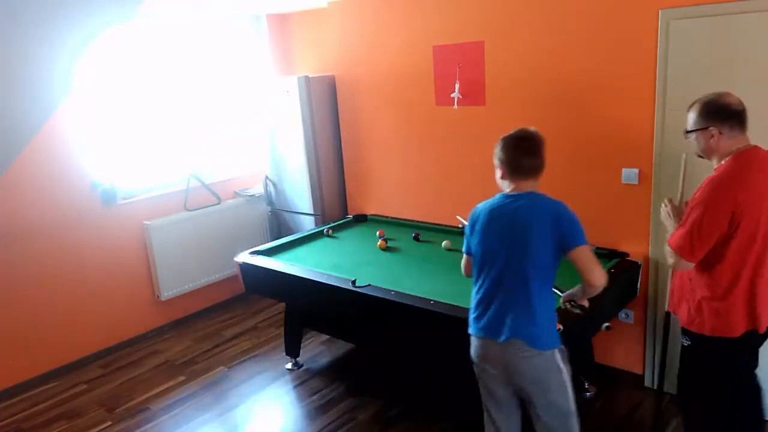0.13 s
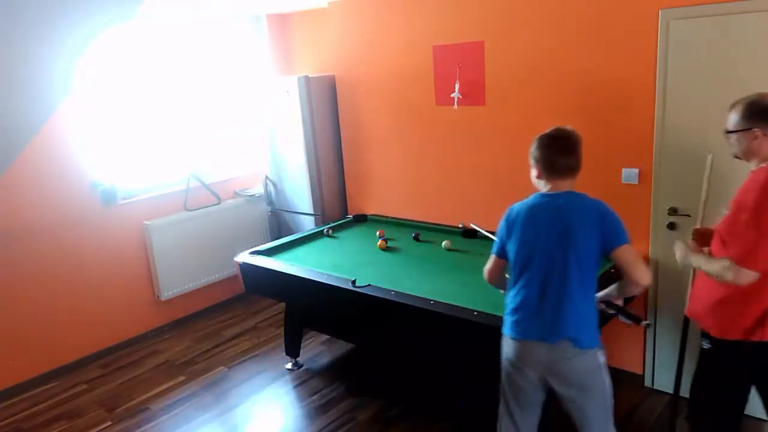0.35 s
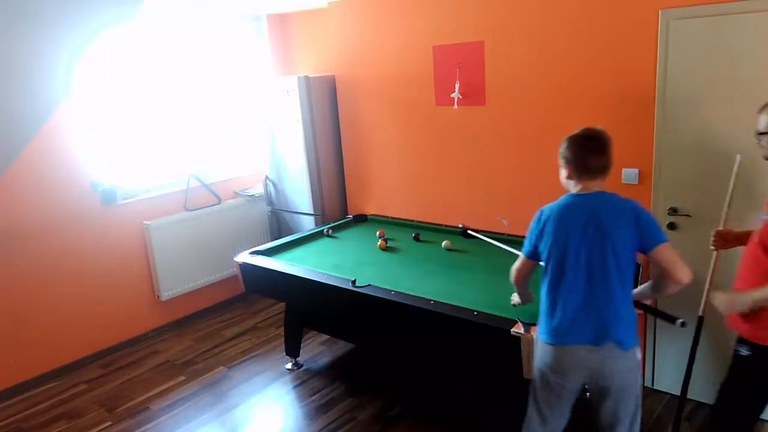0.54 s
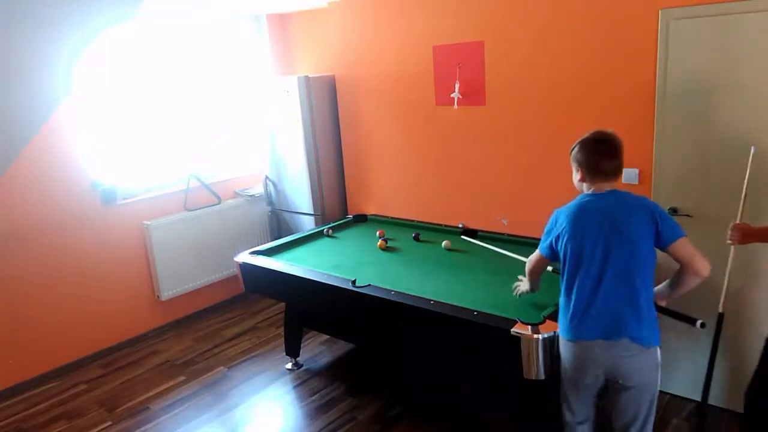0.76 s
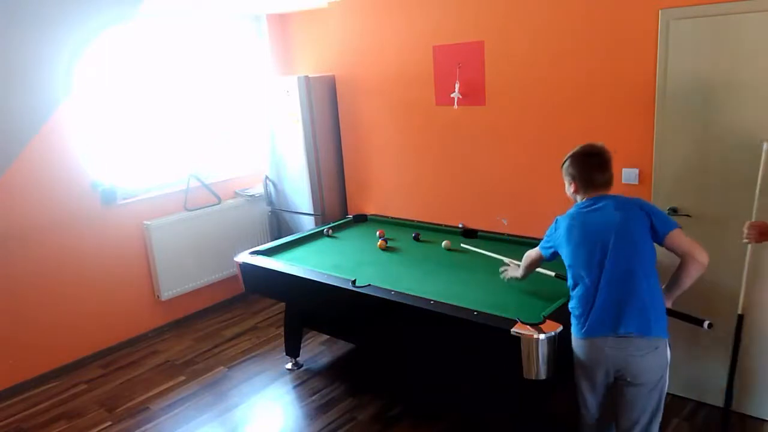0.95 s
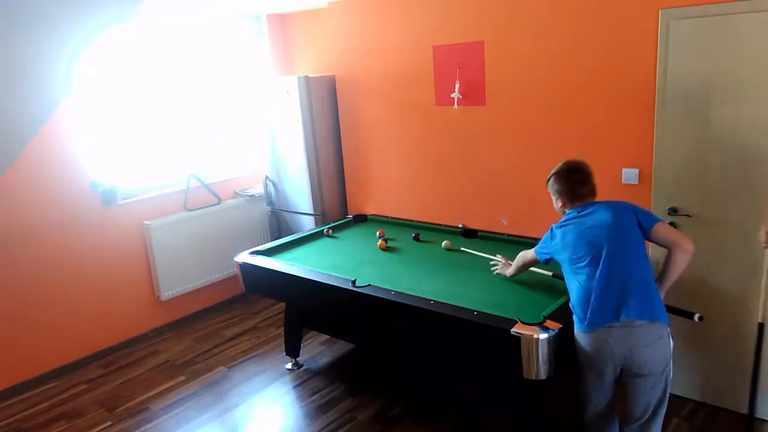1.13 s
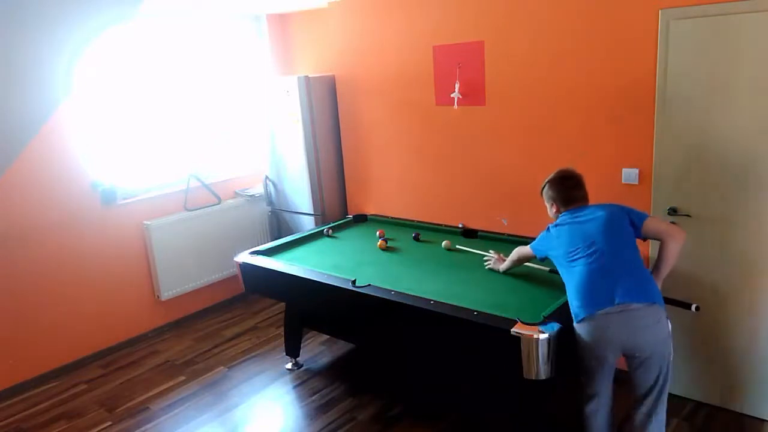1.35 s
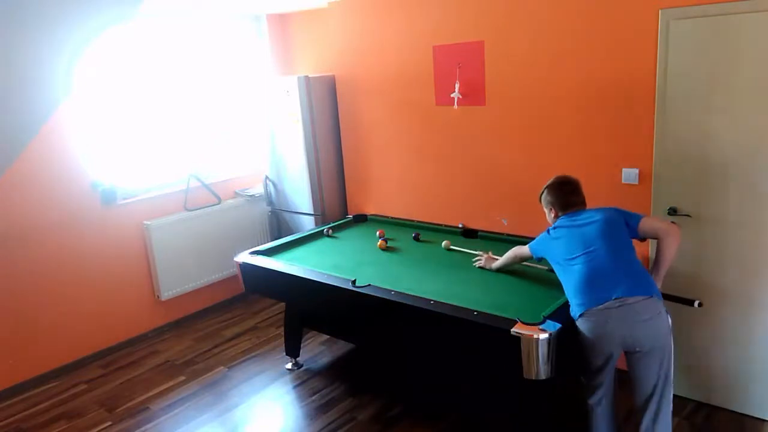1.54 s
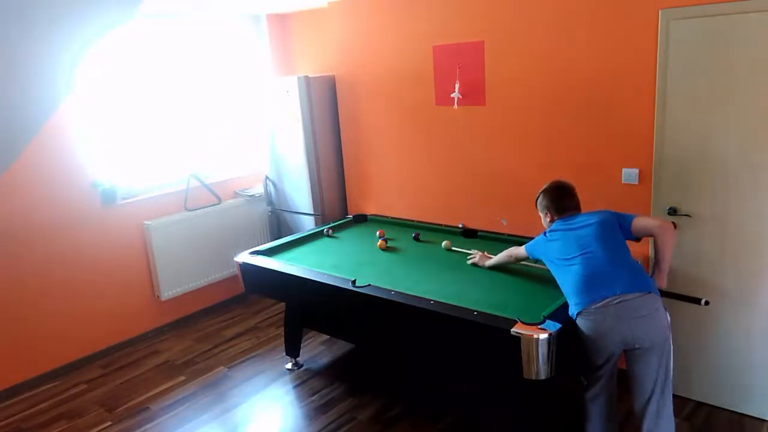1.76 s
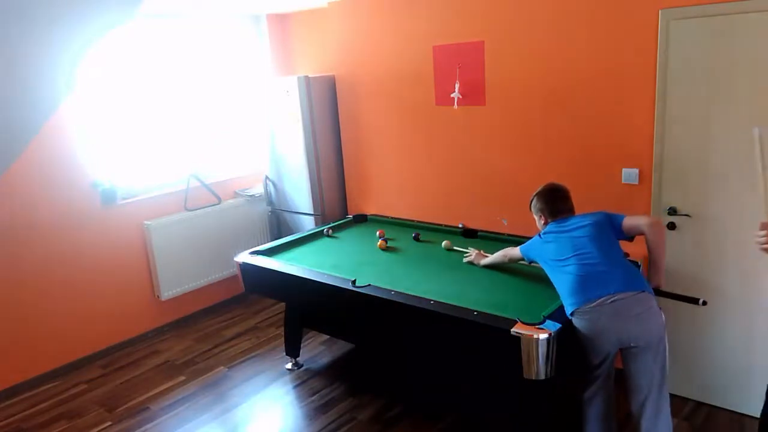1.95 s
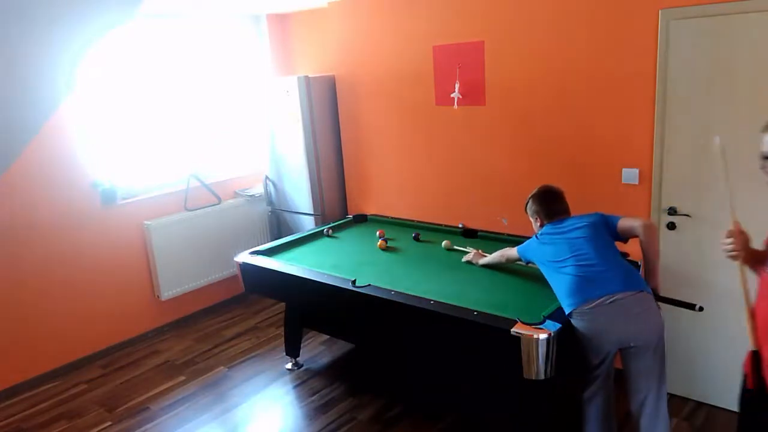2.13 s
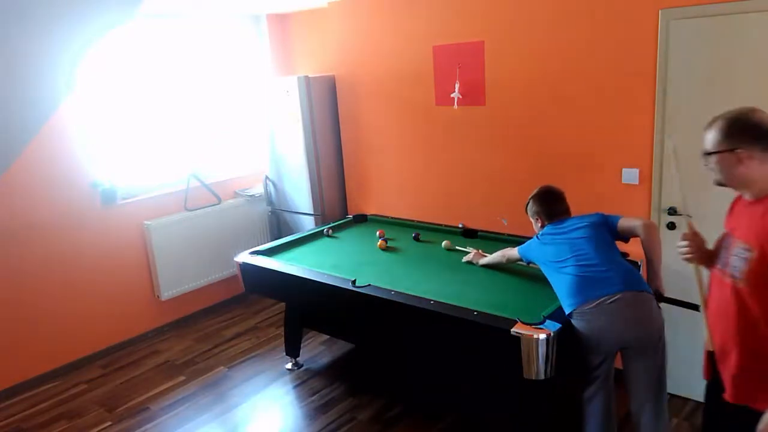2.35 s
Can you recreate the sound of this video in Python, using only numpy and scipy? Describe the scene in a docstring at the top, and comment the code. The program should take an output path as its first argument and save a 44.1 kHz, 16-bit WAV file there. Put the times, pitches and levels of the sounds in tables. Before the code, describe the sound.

Pool cue knocks in a reverberant home room: a loud wooden bang, duller knocks, a sharp ball clack

```python
"""Soles thud and scuff on laminate in a hard-walled home room with a pool table, heard from across the room.
Something wooden bangs, a cue butt knocks, the cue tip clacks on the ball: pushes through resonant bodies,
heard only as the room's answer of shaped noise and standing waves. Clothes and shoes swish (swelling noise)
over rumble and air. It reaches a camera with two ports: the left resonates, the covered right is dull and weak."""
import sys
import numpy as np
from scipy import signal
from scipy.fft import rfft, irfft, next_fast_len
from scipy.io import wavfile
from scipy.ndimage import map_coordinates

SR = 44100
rng = np.random.default_rng(int(sys.argv[2]) if len(sys.argv) > 2 else 0)


def store_pcm(level_fs):
    """Save levels as 16-bit WAV."""
    pcm = np.round(np.clip(level_fs, -1, 1) * 32767).astype(np.int16)
    wavfile.write(sys.argv[1], SR, np.atleast_2d(pcm).T)


N = 105840

# room answer by source place: early parts in dB over the plain tail, *_s of early parts = t60, build_s = time constant
FEET = dict(first_db=1.5, first_s=.03, build_s=.0039, early_db=5.5, early_s=.28)
NEAR = dict(first_db=-4, first_s=.039, build_s=.0022, early_db=-14, early_s=.13)
CORNER = dict(first_db=1, first_s=.031, build_s=.005, early_db=-1, early_s=.4)
TABLE = dict(first_db=5.5, first_s=.029, build_s=.0016, early_db=-19, early_s=.12)


def amp(db):
    """Amplitude ratio of a level in dB."""
    return 10 ** (np.asarray(db) / 20)


def unit(x):
    """x scaled to rms 1 per channel."""
    return x / np.sqrt(np.mean(x ** 2, axis=-1, keepdims=True) + 1e-20)


def along(points, hz):
    """Interpolate (f/Hz, value) points on a log frequency axis."""
    f, v = np.transpose(points)
    return np.interp(np.log(hz + 1), np.log(f + 1), v)


def filtered(x, response):
    """x times a complex response of frequency, zero-padded."""
    n = x.shape[-1]
    m = next_fast_len(n + SR // 4)
    return irfft(rfft(x, m) * response(np.fft.rfftfreq(m, 1 / SR)), m)[..., :n]


def hiss(spectrum):
    """Independent shaped noise of rms 1 in both channels."""
    white = rng.standard_normal((2, N))
    return unit(filtered(white, lambda hz: amp(along(spectrum, hz))))


def wobble(rate_hz):
    """Smooth random curve with rate_hz knots a second."""
    knots = rng.standard_normal(int(N * rate_hz / SR) + 4)
    return map_coordinates(knots, [np.arange(N) * rate_hz / SR])


def background():
    """Lumpy low rumble and the faint air of the room, as slowly wavering noise."""
    # rumble level: t/s, level/dB
    rumble_course = [(0, -53.5), (.24, -71.5), (.41, -47), (0.689, -59), (.88, -68), (1.1, -67.5),
                     (1.3, -58.5), (1.56, -63.5), (1.82, -54.5), (2.4, -59.5)]
    # rumble spectrum: f/Hz, level/dB
    rumble_spectrum = [(20, -38.5), (32, -27.5), (48, -1), (90, -6), (160, -14.5), (300, -22.5), (600, -75)]
    # air spectrum: f/Hz, level/dB
    air_spectrum = [(100, -8.5), (300, -9.5), (550, -9), (850, -7.5), (1300, -16), (3000, -21), (7000, -23),
                    (15000, -16)]
    air_db = -60
    t_s, db = np.transpose(rumble_course)
    rumble_db = np.interp(np.arange(N) / SR, t_s, db) + 2.1 * wobble(9.34)
    rumble = amp(rumble_db) * hiss(rumble_spectrum)
    return rumble + amp(air_db + 0.5 * wobble(4.08)) * hiss(air_spectrum)


def swishes():
    """Cloth and soles brushing: bright noise with Gaussian swell and exponential fade."""
    # brushes: peak t/s, level/dB, rise/s, t60/s
    brushes = [(-.1, -46.5, .1, 1), (0.188, -44, 0.012, 1), (0.729, -56, 0.022, .45),
               (1.06, -70.5, 0.055, 0.54), (1.47, -57.5, 0.048, 0.96), (1.53, -64, 0.03, 0.38),
               (1.641, -66.5, 0.046, 0.42), (1.82, -64, 0.079, 0.89), (2.17, -51, 0.027, 0.36)]
    # brushing spectrum: f/Hz, level/dB
    cloth = [(200, -26), (800, -3), (1500, -5.5), (3000, -5.5), (5000, -4.5), (7000, -5), (10000, -7.5),
             (15000, -20.5)]
    t = np.arange(N) / SR
    shape = np.zeros(N)
    for peak_s, db, rise_s, t60_s in brushes:
        swell = np.exp(-((t - peak_s) / rise_s) ** 2)
        fade = amp(-60 * np.abs(t - peak_s) / t60_s)
        shape += amp(db) * np.where(t < peak_s, swell, fade)
    return shape * amp(0.5 * wobble(28.34)) * hiss(cloth)


def room(first_db, first_s, build_s, early_db, early_s):
    """Room answer in two channels: a noise tail dying by band plus standing waves, with build-up and early boost."""
    # reverberation: f/Hz, t60/s
    decay = [(60, 0.36), (150, 0.77), (300, 0.54), (700, 0.76), (1800, 0.71), (5000, 0.61), (13000, 0.46)]
    # standing waves: f/Hz, level re tail/dB, t60/s
    modes = [(189.2, -25, 0.62), (279, -26.5, 0.58), (337.5, -28, 0.68), (378, -27, 0.52),
             (434, -24.5, 0.23), (566, -21.5, 0.5), (722, -27, 0.48), (889, -28.5, 0.77)]
    hz, t, z = signal.stft(rng.standard_normal((2, SR)), SR, nperseg=256)
    z = z * amp(-60 * t / along(decay, hz)[:, None])
    tail = signal.istft(z, SR, nperseg=256)[1][:, :SR]
    tail = tail / np.linalg.norm(tail[0])
    t = np.arange(SR) / SR
    for f, db, t60_s in modes:
        phase_turns = rng.random((2, 1))
        wave = amp(-60 * t / t60_s) * np.sin(2 * np.pi * (f * t + phase_turns))
        tail = tail + amp(db) * wave / np.linalg.norm(wave[0])
    build = 1 - np.exp(-t / build_s)
    early = amp(early_db - 60 * t / early_s)
    first = amp(first_db - 60 * t / first_s)
    return tail * build * (1 + early + first)


def causal(power):
    """Minimum-phase pulse with this power spectrum, by cepstral folding."""
    c = irfft(np.log(power + 1e-14) / 2)
    c = c * np.where(np.arange(len(c)) < len(c) // 2, 2, 0)
    return irfft(np.exp(rfft(c) - c[0] / 2))


def knocks(events, body, place):
    """Each contact: a soft-edged push through the body's steep resonances plus a high crack, sent into the room."""
    out = np.zeros((2, N + 2 * SR))
    f = np.fft.rfftfreq(8192, 1 / SR)
    ring = np.zeros(len(f))  # power spectrum
    for centre_hz, width_hz, db in body:
        damping = (f * width_hz) ** 2
        peak = damping / ((centre_hz ** 2 - f * f) ** 2 + damping)
        ring += amp(db) ** 2 * peak ** 1.53
    for s, db, soft_hz, crack_db in events:
        push = ring / (1 + (f / soft_hz) ** 2) ** 2
        crack = amp(crack_db) ** 2 * f ** 2 / (f ** 2 + soft_hz ** 2)
        blow = causal(push + crack)
        blow = amp(db) * blow / np.linalg.norm(blow)
        heard = signal.fftconvolve(blow[None], room(**place), axes=1)
        start = round(s * SR)
        out[:, start:start + heard.shape[1]] += heard
    return out[:, :N]


def steps():
    """Soles on laminate: contacts exciting broad floorboard resonances."""
    # contacts: t/s, level/dB, softness corner f/Hz, crack re 0 dB body peak/dB
    contacts = [(.176, -5, 3000, -34.5), (.195, -2.5, 2500, -44.5), (.24, -4, 900, -42),
                (.255, -4, 700, -55)]
    # floorboard: f/Hz, width/Hz, level/dB
    floorboard = [(108.4, 120, -4), (192, 100, 1.5), (319, 108, -2.5), (710, 154, -6.5), (1290, 760, -14),
                  (2480, 2400, -17)]
    return knocks(contacts, floorboard, FEET)


def thumps():
    """Low thumps: very soft pushes on one deep joist resonance."""
    # contacts: t/s, level/dB, softness corner f/Hz, crack re 0 dB body peak/dB
    contacts = [(.185, -17.5, 200, -68), (.41, -17, 200, -70), (.56, -16.5, 199, -63),
                (2.18, -16.5, 200, -68)]
    # joists: f/Hz, width/Hz, level/dB
    joists = [(65, 22, 0)]
    return knocks(contacts, joists, FEET)


def wooden_bang():
    """Wooden bang: two close contacts on a many-moded wooden body."""
    # contacts: t/s, level/dB, softness corner f/Hz, crack re 0 dB body peak/dB
    contacts = [(.367, 12.5, 3000, -27.5), (.373, 18.5, 3000, -38.5)]
    # wood: f/Hz, width/Hz, level/dB
    wood = [(126, 42, -6.5), (187, 124, -7), (282.5, 120, 1.5), (492, 300, -9), (780, 310, -4),
            (950, 320, -6.5), (1423, 630, -8.5), (2280, 1800, -16.5), (3730, 2300, -18)]
    return knocks(contacts, wood, NEAR)


def butt_knocks():
    """Cue butt: two main knocks and weaker contacts exciting the cue's resonances."""
    # contacts: t/s, level/dB, softness corner f/Hz, crack re 0 dB body peak/dB
    contacts = [(1.146, -9.5, 900, -49), (1.151, 9.5, 2500, -41.5), (1.877, 4.5, 1120, -51.5),
                (2.003, -11, 900, -47), (2.088, -10.5, 900, -47)]
    # cue: f/Hz, width/Hz, level/dB
    cue = [(146, 40, -12.5), (294.6, 104, 0.5), (431, 226, 0), (611, 170, -7), (830, 267, -5.5),
           (1300, 460, -16), (1736, 420, -11), (2550, 250, -13), (3230, 400, -14.5), (4180, 990, -20)]
    return knocks(contacts, cue, CORNER)


def ball_clack():
    """Cue tip on ball: two close hard contacts, brightest near 2.4 kHz."""
    # contacts: t/s, level/dB, softness corner f/Hz, crack re 0 dB body peak/dB
    contacts = [(2.102, -5, 6060, -32), (2.106, 4.5, 5650, -31)]
    # ball: f/Hz, width/Hz, level/dB
    ball = [(307, 180, -4), (900, 450, -4.5), (1390, 290, -1), (1700, 540, -3.5), (2150, 310, 0),
            (2425, 193, 4.5), (3400, 510, -19), (4760, 740, -29.5)]
    return knocks(contacts, ball, TABLE)


def paired(x):
    """Make the second channel partly a copy of the first, by frequency."""
    # likeness of the ports: f/Hz, likeness (0..1)
    likeness = [(50, 0.67), (300, 1), (700, 0.2), (1500, 0.27), (4000, .1)]
    alike = lambda f: np.clip(along(likeness, f), 0, 1)
    shared = filtered(x[0], alike)
    own = filtered(x[1], lambda f: np.sqrt(1 - alike(f) ** 2))
    return np.array([x[0], shared + own])


def scene():
    """Everything as it reaches the two ports."""
    feet = steps() + thumps() + swishes()
    game = wooden_bang() + butt_knocks() + ball_clack()
    return paired(background() + feet + game)


def open_port(f):
    """Left port: direct path plus a resonance, through a two-pole treble roll-off."""
    port_hz, width_hz, peak_db, roll_hz = 6494, 1504, 15, 9000
    damping = 1j * f * width_hz
    resonance = damping / (port_hz ** 2 - f * f + damping)
    return (1 + amp(peak_db) * resonance) / (1 + 1j * f / roll_hz) ** 2


def covered_port(f):
    """Right port: the cover's loss by frequency and a later arrival."""
    # cover: f/Hz, loss/dB
    cover = [(60, 4.5), (110, 19), (200, 12), (380, 29), (700, 22.5), (1290, 27.5), (2380, 18.5),
             (4400, 29), (8120, 28), (15000, 30)]
    lag_s = .0007
    return amp(-along(cover, f)) * np.exp(-2j * np.pi * f * lag_s)


def record(dry):
    """Both port responses, self-noise in each channel, then a sharp band limit."""
    # self-noise spectrum: f/Hz, level/dB
    self_spectrum = [(40, 1.5), (300, -9), (700, -15.5), (2000, -26.5), (7000, -30), (11000, -25),
                     (13000, -49), (15500, -61.5)]
    self_db, top_hz = -64.5, 15800
    heard = filtered(dry, lambda f: np.array([open_port(f), covered_port(f)]))
    heard = heard + amp(self_db) * hiss(self_spectrum)
    return filtered(heard, lambda hz: hz < top_hz)


dry = scene()
out = record(dry)
store_pcm(out)
```